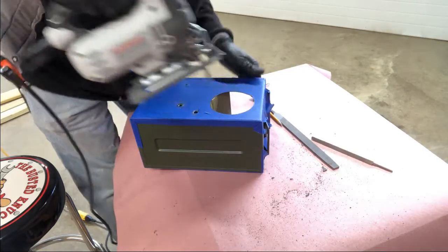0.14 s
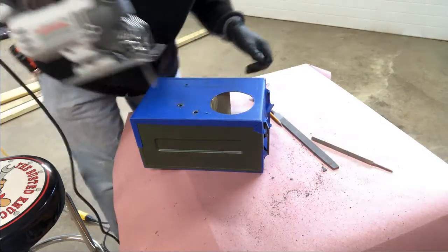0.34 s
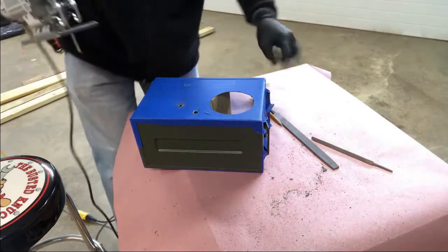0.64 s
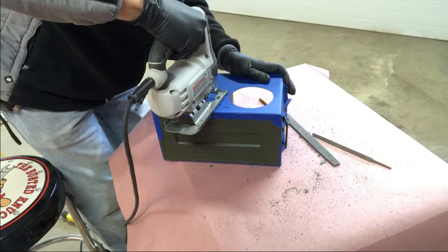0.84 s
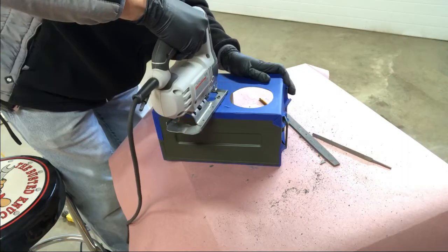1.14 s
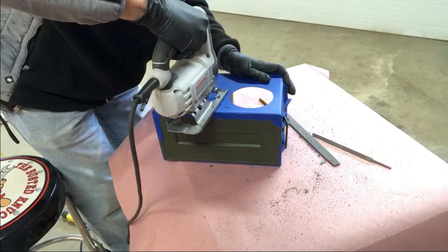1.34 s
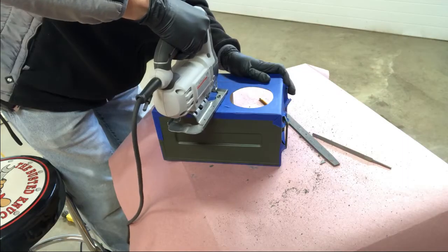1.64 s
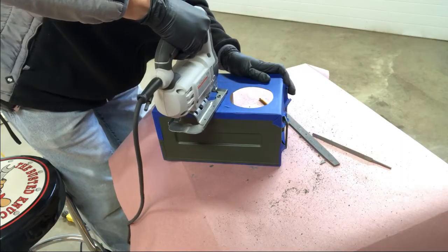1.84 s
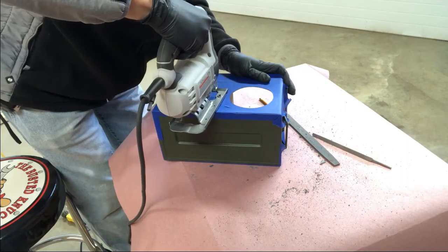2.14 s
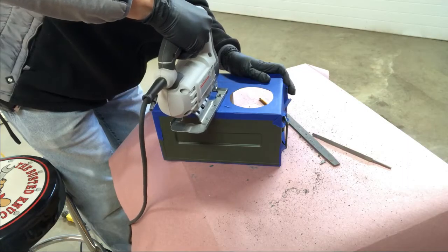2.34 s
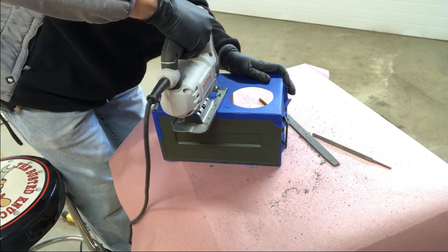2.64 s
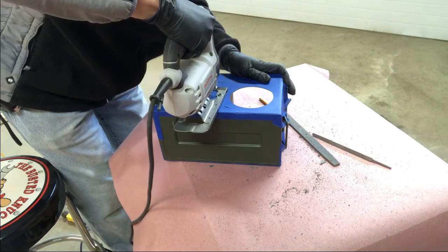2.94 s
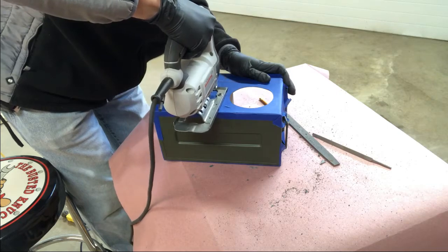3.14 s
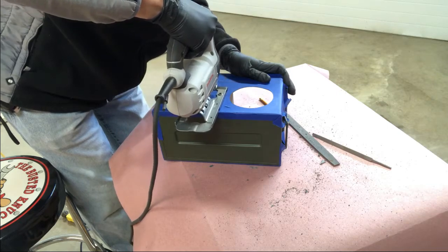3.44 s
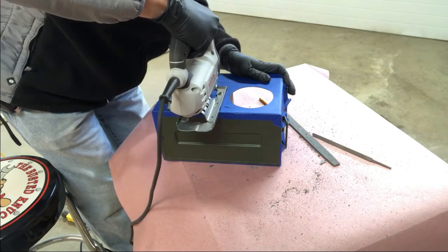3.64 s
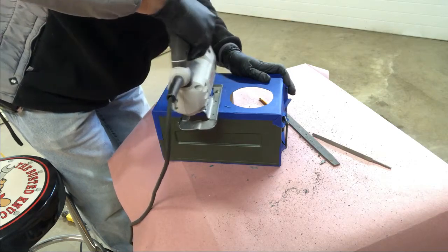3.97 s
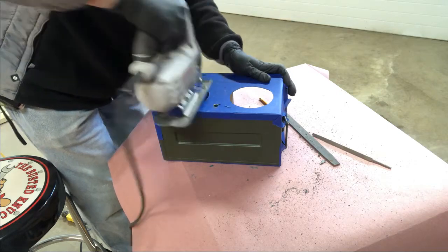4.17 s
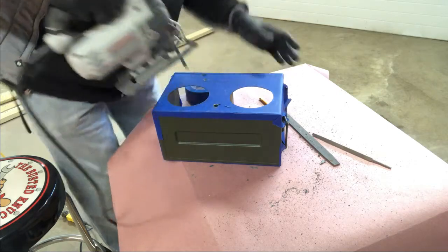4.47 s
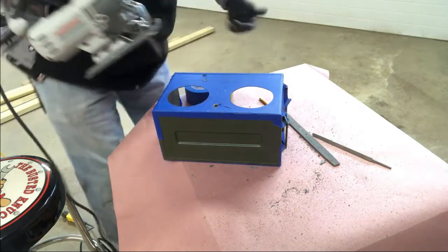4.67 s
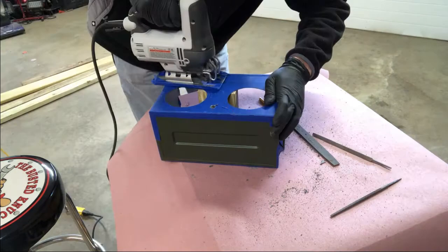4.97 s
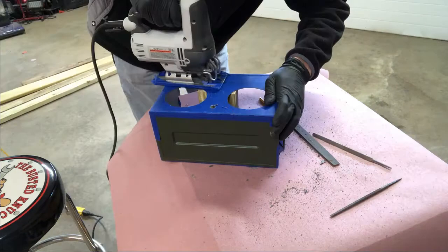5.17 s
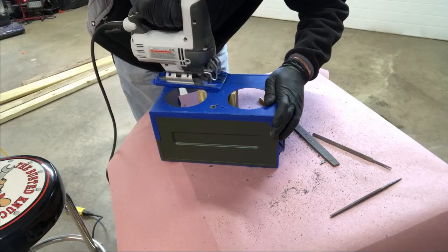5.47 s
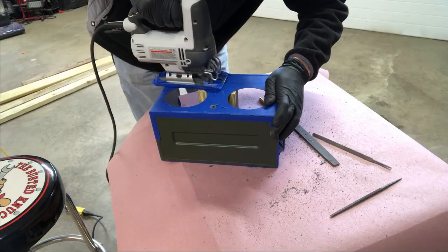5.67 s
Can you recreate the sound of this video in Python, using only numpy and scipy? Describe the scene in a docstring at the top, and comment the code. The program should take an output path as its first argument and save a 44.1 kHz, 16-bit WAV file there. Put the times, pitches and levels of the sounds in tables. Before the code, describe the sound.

A jigsaw is heard close up in mono, in a small workshop with a short echo and faint still air. From 0 to 0.75 s the switched-off motor runs down quietly: slowing swishes, falling gear whine, dry plunger ticks and tiny very high squeaks, with a few lower falling chirps. At 0.75 s a loud cut bursts in abruptly, about 43 strokes per second: an even metallic buzz, thin steel ringing with clear tones, teeth rasping. Around 2.6 s the blade binds; the sound grows rougher, hissier and more clattering, the hollow box shaking, then weakens and breaks free near 3.65 s. The blade grazes the rim softly while the motor coasts down until 4.9 s, its whine sinking, the swish pulsing slower, faint squeaks near the end. At 4.91 s a slower, heavier cut starts suddenly, about 30 strokes per second, coarse, loud and juddering, steady to the end.

```python
"""In a small workshop, a corded jigsaw cuts round holes in a thin steel box.
Each stroke of the blade knocks the sheet several times, which rings a bank of gliding resonances,
and its teeth rasp on the edge as filtered grainy noise: first fast, later slower and juddering.
Between cuts the motor coasts down: the gears whine lower as sines tied to the stroke rate,
and the plunger swishes as pulsing noise and squeaks in its guide as short high chirps."""
import sys
import numpy as np
from scipy import signal
from scipy.fft import rfft, irfft, next_fast_len
from scipy.io import wavfile

SR = 44100
rng = np.random.default_rng(int(sys.argv[2]) if len(sys.argv) > 2 else 0)


def master(y):
    """Save y as 16-bit WAV."""
    cut = np.clip(np.atleast_2d(y).T, -1, 1)
    pcm = np.round(cut * 32767)  # scale
    wavfile.write(sys.argv[1], SR, pcm.astype(np.int16))


N = 256220
T = np.arange(N) / SR   # s
# when the fast cut starts, the blade binds, comes free, and the slow cut starts (s)
FAST_S, BIND_S, FREE_S, SLOW_S = .745, 2.585, 3.65, 4.912
BOOM_TOP_HZ = 590   # below this the box booms, above it the sheet rings


def from_db(db):
    """Decibels to gain."""
    return 10 ** (np.asarray(db) / 20)


def rms_one(x):
    """Scale to rms 1."""
    return x / np.sqrt(np.mean(x ** 2) + 1e-20)


def in_time(rows):
    """Each column of a curve, interpolated at every sample."""
    s, *columns = np.transpose(rows)
    return [np.interp(T, s, column) for column in columns]


def between(start, stop, fade=0.00072):
    """A gate that opens and closes over the fade time in seconds."""
    opening = np.clip((T - start) / fade, 0, 1)
    closing = np.clip((stop - T) / fade, 0, 1)
    return opening * closing


def drift(rate):
    """Smooth random wandering of rms 1, with this many turning points a second."""
    knots = rng.standard_normal(N // 10)
    return rms_one(np.interp(T * rate, np.arange(len(knots)), knots))


def colour(x, points):
    """Filter by a spectrum of (Hz, dB) points, joined on a log frequency scale; rms 1."""
    size = next_fast_len(len(x), True)
    hz, db = np.transpose(points)
    log_bins = np.log(np.maximum(np.arange(size // 2 + 1) * SR / size, 1))
    gain = from_db(np.interp(log_bins, np.log(hz), db))
    return rms_one(irfft(rfft(x, size) * gain, size)[:len(x)])


def band(x, hz, kind, order=2):
    """Butterworth filter."""
    sos = signal.butter(order, np.minimum(hz, SR / 2 - 1), kind, fs=SR, output="sos")
    return signal.sosfilt(sos, x)


def resonate(x, hz, width):
    """One resonance, whose pitch may glide: shift it to 0 Hz, smooth, shift it back; rms 1."""
    turning = np.exp(2j * np.pi * np.cumsum(hz + np.zeros(len(x))) / SR)
    decay = np.exp(-np.pi * abs(width) / SR)
    envelope = signal.lfilter([1], [1, -decay], x / turning + 1e-18)
    return rms_one((turning * envelope).real)


def tail(x, t60):
    """Countless close modes or echoes: a dying noise response of unit energy."""
    response = rng.standard_normal(SR // 2) * from_db(-60 * T[:SR // 2] / t60)
    return signal.fftconvolve(x, response / np.linalg.norm(response))[:N]


def grains(grain_db):
    """Noise made of tiny impacts of uneven size."""
    return rng.standard_normal(N) * from_db(grain_db * drift(3000))


# the motor sags a little under load in the fast cut: time_s, speed_strokes_per_s
CUT_SPEED = [(.745, 42.79), (1.15, 42.24), (1.45, 42.25), (1.9, 42.67), (2.45, 42.54), (2.7, 42.8),
             (3.2, 42.84), (3.65, 43.2)]
SLOW_STROKES_PER_S = 30.33
# switched off at full speed, the motor first loses speed by air drag
SWITCH_OFF_S, COAST_DECAY_S = 3.687, 1.44
# once it is slow, friction brakes it evenly
RUNDOWN_STROKES_PER_S, BRAKING_PER_S2 = 19.32, 16.14


def motor_speed():
    """Strokes per second: running down, cutting fast, coasting, cutting slowly."""
    running_down = RUNDOWN_STROKES_PER_S - BRAKING_PER_S2 * T
    drag = np.exp(-np.maximum(T - SWITCH_OFF_S, 0) / COAST_DECAY_S)
    fast = in_time(CUT_SPEED)[0] * drag
    return np.select([T < FAST_S, T < SLOW_S], [running_down, fast], SLOW_STROKES_PER_S)


def crank():
    """Strokes made so far; the speed jumps at 0.745 s and 4.912 s, where the scene changes."""
    return np.cumsum(motor_speed()) / SR


# contacts of blade and shoe: stroke_share, level_db (relative, at 1700 Hz), brightness_db_per_octave
FAST_KNOCKS = [(.054, 2, -27), (.3, -4, -7), (.357, -11, 6), (.458, -18, -3), (.631, -16, 2),
               (.797, -6, -9), (.869, -14, 13), (.931, -9, 16)]
# the blade clicks against its guide: stroke_share, level_db (relative)
FAST_CLICKS = [(.41, -2), (0.959, -3)]
# the teeth bite going up and coming down: stroke_share, half_length_share, boost_db
FAST_BITES = [(.42, 0.15, 6.5), (.99, 0.099, 4)]
# resonances of the box, as in mid-cut: pitch_hz, width_hz, level_db (relative), glide_hz, change_db
FAST_MODES = [(413, 49, -13, 7, -12), (825, 19, -21.5, -1, 0.5), (1046, 57, -21, 4, -2),
              (1221, 26, -22.5, 4, 21), (1540, 58, -12, 6, -6), (1669, 100, -4.5, -11, 0.5),
              (1759, 27, -9.5, -15, 1.5), (1995, 10, -13.5, 34, -1), (2156, 110, -9.5, -74, 3),
              (2737, 100, -6.5, -25, -2), (3130, 65, -22, -20, 0), (3250, 62, -12.5, -50, 0.5),
              (5210, 56, -23.5, 9, 12)]
# low shaking of the box: stroke_rate_multiple, level_db (relative)
FAST_HUM = [(3, -13.5), (4, -13), (5, -5), (6, -5), (7, -4), (8, -4), (10, -12)]
# broad colour of the rasp and clatter: pitch_hz, level_db (relative)
FAST_COLOUR = [(59, -60), (100, -12), (205, 2), (396, 6.5), (460, 10), (593, -48), (925, -6), (1070, 0.5),
               (1300, -2.5), (1750, 2), (2400, -9), (2780, 1), (3660, -9.5), (7690, -20), (15800, -27)]
# how hard the saw is pushed, as the reference level of the sheet: time_s, push_db
FAST_PUSH = [(0.77, -38.5), (0.774, -37.5), (1.512, -40.5), (1.626, -41.5), (2.494, -41.5), (2.548, -46),
             (2.57, -43)]


def fast_cut(strokes):
    """Brisk, even sawing with clear tones of the sheet on top."""
    levels = under_load(in_time(FAST_PUSH)[0], rasp_follows=0.81)
    return singing(strokes, levels[1]) + cut(
        strokes, FAST_S, BIND_S, levels, FAST_KNOCKS, FAST_CLICKS, FAST_BITES,
        FAST_MODES, FAST_HUM, FAST_COLOUR,
        ring_db=-2.0, clatter_db=-16, hum_db=-24.5, boom_db=-23, rumble_db=-26.5,
        scrape_db=-10.5, rasp_db=-5.5, click_db=-15.5,
        bite_at=0.63, bite_db=2.0, scrape_lopsided_db=0.0, grain_db=-0.2)


# contacts of blade and shoe: stroke_share, level_db (relative, at 1700 Hz), brightness_db_per_octave
BIND_KNOCKS = [(0.042, -8.0, -19.6), (0.264, -0.8, 10.0), (0.38, -5.5, 9.3), (0.429, -4.9, 1.1),
               (0.622, -7.4, -14.6), (0.746, 4.3, 6.4), (0.892, 2.3, 8.5)]
# the blade clicks against its guide: stroke_share, level_db (relative)
BIND_CLICKS = [(.26, 0), (.73, -6), (.82, 0)]
# the teeth bite going up and coming down: stroke_share, half_length_share, boost_db
BIND_BITES = [(.21, 0.11, 6.6), (.85, 0.14, 4)]
# resonances of the box, as in mid-cut: pitch_hz, width_hz, level_db (relative), glide_hz, change_db
BIND_MODES = [(440, 40, -6, -62, 5), (777, 96, -13, 0, 6.5), (1007, 120, -12, 0, 2.5),
              (1157, 18, -17.5, 0, -3), (1206, 28, -10, -10, -2), (1499, 13, -18, 0, -10),
              (1905, 50, -19, 0, -2), (1465, 21, -3.5, -6, -1.5), (1585, 12, -9.5, -5, 8),
              (1710, 96, -9, -47, -1), (1763, 24, -7, -9, 2), (1848, 18, -7, -14, -4),
              (2073, 30, -13.5, 0, 2), (2250, 30, -14, -6, -4), (2740, 84, -14.5, -30, -2),
              (3127, 15, -14, -2, -3), (3840, 150, -15, 0, -1), (5240, 250, -13.5, 0, -2)]
# low shaking of the box: stroke_rate_multiple, level_db (relative)
BIND_HUM = [(3, -24.5), (4, -16), (5, -9), (6, -8.5), (7, -21), (8, -1), (9, -1), (10, 6.5), (11, 0.5)]
# broad colour of the rasp and clatter: pitch_hz, level_db (relative)
BIND_COLOUR = [(59, -69), (100, -41), (422, -6), (593, -16), (760, -14.5), (1170, -7), (1270, -16),
               (1440, -6), (1670, -1.5), (1780, -4.5), (2350, -10.5), (3090, -10.5), (3370, -13),
               (5140, -18), (5720, -21), (15800, -28.5)]
# how hard the saw is pushed, as the reference level of the sheet: time_s, push_db
BIND_PUSH = [(2.6, -39.5), (2.602, -39.5), (3.234, -39.5), (3.508, -42.5), (3.595, -43.5), (3.625, -51.5),
             (3.65, -66)]


def binding_cut(strokes):
    """The blade binds in the curve, hisses more, then breaks through."""
    levels = under_load(in_time(BIND_PUSH)[0], rasp_follows=1.5)
    return cut(
        strokes, BIND_S, FREE_S, levels, BIND_KNOCKS, BIND_CLICKS, BIND_BITES,
        BIND_MODES, BIND_HUM, BIND_COLOUR,
        ring_db=-1.13, clatter_db=-10.5, hum_db=-15.0, boom_db=-19.5, rumble_db=-20.0,
        scrape_db=-7, rasp_db=-5, click_db=-11.5,
        bite_at=0.31, bite_db=-1.5, scrape_lopsided_db=0.5, grain_db=0.8)


# contacts of blade and shoe: stroke_share, level_db (relative, at 1700 Hz), brightness_db_per_octave
SLOW_KNOCKS = [(0.172, 7.1, -11.6), (0.24, -0.0, -0.2), (0.305, -4.6, 13.1), (0.436, 1.5, 4.0),
               (0.512, 0.4, -3.7), (0.707, -8.5, 10.5), (0.844, -1.9, -6.8), (0.907, -5.0, 2.8)]
# the blade clicks against its guide: stroke_share, level_db (relative)
SLOW_CLICKS = [(.27, -3), (.36, -4), (.46, -7), (.72, -9), (.85, 0)]
# the teeth bite going up and coming down: stroke_share, half_length_share, boost_db
SLOW_BITES = [(.41, 0.12, 2.3), (.8, 0.093, 7.9)]
# resonances of the box, as in mid-cut: pitch_hz, width_hz, level_db (relative), glide_hz, change_db
SLOW_MODES = [(335, 18, -8, 5, 0), (744, 70, -17, -2, -1), (841.4, 20, -12.5, -14, 1.5),
              (1133, 100, -18, 0, 0), (1700, 22, -13, 0, -1), (2346, 90, -20, 0, -7), (3095, 46, -20, 0, 0),
              (1007, 62, -12, 17, 4), (1233, 264, -9.5, 22, 1.5), (1367, 68, -8.5, 8, -4),
              (1574, 61, -7, 20, 1), (1826, 160, -12.5, 57, 5), (2000, 13, -17.5, 13, 3),
              (2230, 18, -20, 15, -5), (2610, 58, -13, 38, -4), (3165, 32, -12.5, -30, 4),
              (3242, 110, -14, -43, -9), (3450, 120, -14.5, -24, -5), (4990, 23, -28, 0, 9)]
# low shaking of the box: stroke_rate_multiple, level_db (relative)
SLOW_HUM = [(2, -29), (4, -23), (5, -3.5), (6, -7.5), (7, 0.5), (8, -9), (9, -11), (10, -15), (11, 3.5),
            (12, -4.5), (13, -1), (14, -6.5), (15, -1), (16, -4)]
# broad colour of the rasp and clatter: pitch_hz, level_db (relative)
SLOW_COLOUR = [(35, -66), (60, -30), (206, -12), (300, -3.5), (337, -1.5), (416, -15), (467, -9),
               (563, -12.5), (837, -1), (1080, -4), (1570, -0.5), (1810, -8), (3160, -7.5), (4090, -15),
               (12000, -26), (15800, -27.5)]
SLOW_PUSH_DB = -37


def slow_cut(strokes):
    """Slower, heavier strokes under a steady push make the box judder."""
    levels = under_load(SLOW_PUSH_DB, rasp_follows=0.98)
    return cut(
        strokes, SLOW_S, np.inf, levels, SLOW_KNOCKS, SLOW_CLICKS, SLOW_BITES,
        SLOW_MODES, SLOW_HUM, SLOW_COLOUR,
        ring_db=-1.9, clatter_db=-9.5, hum_db=-11.0, boom_db=-29, rumble_db=-13.5,
        scrape_db=-8, rasp_db=-3.5, click_db=-12,
        bite_at=0.33, bite_db=3.5, scrape_lopsided_db=1.0, grain_db=2.0)


CLICK_T60_S, CLICK_LOW_HZ, CLICK_HIGH_HZ = 0.033, 3420, 6120


def cut(strokes, start, stop, levels, knocks, guide_clicks, bites, modes, hum, spectrum,
        ring_db, clatter_db, hum_db, boom_db, rumble_db, scrape_db, rasp_db, click_db,
        bite_at, bite_db, scrape_lopsided_db, grain_db):
    """The blade in the steel: knocks ring the box, the teeth rasp, the box shakes with the strokes."""
    gate = between(start, stop)
    strokes = strokes - np.interp(start, T, strokes)
    boom, ring, rasp = from_db(levels)

    def even(x):
        """Rms 1 while the blade cuts."""
        return x / np.sqrt(np.mean(x[gate > 0] ** 2))

    clicks = knocking(strokes, knocks)
    rings = list(ringing(clicks, gate, modes))
    sheet = sum(sound for hz, sound in rings if hz >= BOOM_TOP_HZ)
    box = sum(sound for hz, sound in rings if hz < BOOM_TOP_HZ)
    out = ring * from_db(ring_db) * even(sheet)
    out += ring * from_db(boom_db) * even(box)
    # between its strong resonances the sheet has many weak, short ones
    clatter = band(colour(tail(clicks(2200), .018), spectrum), [750, 5500], "band")
    out += ring * from_db(clatter_db) * even(clatter)
    shaking = sum(from_db(db + 1.0 * drift(13)) * np.sin(2 * np.pi * (k * strokes + rng.random()))
                  for k, db in hum)
    out += boom * from_db(hum_db) * even(shaking)
    # the scrape pulses twice a stroke and may be stronger one way
    angle = 2 * np.pi * (strokes - bite_at)
    bite = from_db(bite_db * np.cos(2 * angle) + 0.38 * drift(70))
    lopsided = from_db(scrape_lopsided_db * np.cos(angle))
    teeth = colour(grains(grain_db) * biting(strokes, bites) * from_db(0.67 * drift(70)), spectrum)
    scrape = colour(grains(grain_db) * bite * lopsided, spectrum)
    out += rasp * from_db(rasp_db) * even(blade(band(teeth, 4330, "high")))
    click_train = knocking(strokes, [(at, db, 0) for at, db in guide_clicks])(CLICK_LOW_HZ)
    clicking = band(tail(click_train, CLICK_T60_S), [CLICK_LOW_HZ, CLICK_HIGH_HZ], "band", order=3)
    out += rasp * from_db(click_db) * even(clicking)
    out += ring * from_db(scrape_db) * even(band(scrape, [550, 3400], "band"))
    out += boom * from_db(rumble_db) * even(band(scrape, BOOM_TOP_HZ, "low", order=4))
    return out * gate


def knocking(strokes, knocks):
    """Contacts repeat unevenly every stroke; gives the click train as felt at a frequency."""
    share, level_db, tilt_db = np.transpose(knocks)
    turns = np.arange(np.ceil(strokes[0]), np.ceil(strokes[-1]))[:, None] + share
    times = np.interp(turns, strokes, T) + .000026 * rng.standard_normal(turns.shape)   # s
    at = np.clip(np.round(times * SR).astype(int), 0, N - 1).ravel()
    force_db = level_db + 1.2 * rng.standard_normal(turns.shape)

    def train(hz):
        """Clicks with the force they have at this frequency."""
        return np.bincount(at, from_db(force_db + tilt_db * np.log2(hz / 1700)).ravel(), N)

    return train


SKIRT_HZ = 235


def ringing(clicks, gate, modes):
    """Knocks ring the sheet; each resonance drifts as the slot grows. Gives (Hz, sound) pairs."""
    cutting = gate > 0
    progress = -np.cos(np.linspace(0, np.pi, cutting.sum())) / 2   # -1/2 to 1/2 over the cut
    for hz, width, db, glide_hz, change_db in modes:
        # each resonance swells over a few cycles as bending waves spread
        force = band(clicks(hz)[cutting], [hz - SKIRT_HZ, hz + SKIRT_HZ], "band")
        level = from_db(db + change_db * progress)
        sound = np.zeros(N)
        sound[cutting] = level * resonate(force, hz + glide_hz * progress, width)
        yield hz, sound


def biting(strokes, bites):
    """Gain of the rasp through the stroke: a smooth hump at each bite."""
    gain_db = 0
    for at, length, db in bites:
        away = (strokes - at + .5) % 1 - .5   # shortest way round the stroke
        gain_db = gain_db + db * np.exp(-(away / length) ** 2)
    return from_db(gain_db)


# high resonances of blade and shoe: pitch_hz, width_hz, level_db (relative to the friction noise)
BLADE = [(4050, 250, -18), (5330, 550, -51), (7800, 410, -18), (10230, 560, -20.5), (14800, 400, -27)]


def blade(x):
    """Friction noise with the ring of blade and shoe on top; rms 1."""
    ring = sum(from_db(db) * resonate(x, hz, width) for hz, width, db in BLADE)
    return rms_one(rms_one(x) + ring)


# steady tones of the sheet: stroke_rate_multiple, level_db (relative to the ring), change_db_per_s
FAST_TONES = [(11, -14, -4), (26.1, -15, -4), (34, -13, -5), (35, -9.5, -3)]


def singing(strokes, ring_db):
    """Multiples of the stroke rate that meet a resonance of the sheet stand out as clear tones."""
    tones = 0
    for k, db, db_per_s in FAST_TONES:
        level = from_db(ring_db + db + db_per_s * (T - FAST_S) + drift(13.4))
        tones = tones + level * np.sin(2 * np.pi * (k * strokes + rng.random()))
    return between(FAST_S, BIND_S) * tones


USUAL_PUSH_DB = -40
BOOM_FOLLOWS = 0.64   # share of a change in push that reaches the boom of the box
# the box shakes harder for a while as the blade bites in, mid-cut, and as the disc comes loose:
# centre_s, half_length_s, boost_db
BOOMS = [(0.884, 0.088, 0.5), (2.1, 0.49, 6), (2.672, 0.025, 4), (3.58, 0.25, 6)]


def under_load(push_db, rasp_follows):
    """Levels of box boom, sheet ring and tooth rasp in dB: all three rise with the push."""
    harder = push_db - USUAL_PUSH_DB + np.zeros(N)
    swells = sum(db * np.exp(-((T - s) / length) ** 2) for s, length, db in BOOMS)
    return USUAL_PUSH_DB + np.array([BOOM_FOLLOWS * harder + swells, harder, rasp_follows * harder])


# broad colour of the sliding plunger: pitch_hz, level_db (relative)
COAST_COLOUR = [(47, -50), (80, -45), (114, -27), (145, -22), (360, -3.5), (612, -3), (684, -0.5),
                (1980, -2), (2410, -1.5), (4290, -1.5), (7130, -7), (9710, -9.5), (11300, -13.5),
                (12400, -16), (15800, -17.5)]


def coasting(strokes):
    """The works run under the fast cut, then slow down in the open."""
    levels = with_speed(rattle_db_per_octave=5.0, slide_db_per_octave=3.0, gears_db_per_octave=3.0)
    works = free_run(strokes - np.interp(FREE_S, T, strokes), levels, COAST_COLOUR,
                     slide_at=0.034, swish_db=0.5, slide_db=-56.5, rattle_db=-70.0,
                     gears_db=-58.5, throb_at=0.037, throb_db=10)
    return works * between(FAST_S, SLOW_S) + grazing(strokes)


# broad colour of the sliding plunger: pitch_hz, level_db (relative)
RUNDOWN_COLOUR = [(47, -58), (80, -41), (295, -17.5), (368, -19), (763, -7), (1020, -9), (1400, -5.5),
                  (1650, 0.5), (1900, -6.5), (2800, -5), (3670, -4.5), (4290, -6.5), (9090, -10.5),
                  (12700, -12), (15800, -16)]


def rundown(strokes):
    """The last slow strokes of a motor switched off."""
    levels = with_speed(rattle_db_per_octave=14.5, slide_db_per_octave=8.5, gears_db_per_octave=22)
    works = free_run(strokes, levels, RUNDOWN_COLOUR,
                     slide_at=0.11, swish_db=2.0, slide_db=-46.5, rattle_db=-59.0,
                     gears_db=-48.5, throb_at=0.042, throb_db=9)
    return works * between(-1, FAST_S) + ticks() + low_chirps()


# gear whine: stroke_rate_multiple, level_db (relative)
GEARS = [(68, 3), (136, -1), (204, 7), (272, 2), (340, -1)]
# how well the housing radiates the whine: pitch_hz, gain_db
HOUSING = [(1000, -24), (1250, -16), (1400, -6), (1600, -3), (1800, -5), (2050, -6), (2300, -19),
           (3200, -16), (3550, -5), (3850, -5), (4000, -16), (4300, -7), (4520, -4.5), (4900, -19),
           (5500, -12), (5900, -16), (6450, -8), (7300, -22), (8000, -16), (8800, -12), (9300, -17),
           (9800, -5), (10400, -21)]


def free_run(strokes, levels, spectrum, slide_at, swish_db, slide_db, rattle_db,
             gears_db, throb_at, throb_db):
    """The saw's own works: plunger sliding twice a stroke, and gear whine."""
    rattle, slide, gears = from_db(levels)
    pace = np.cos(4 * np.pi * (strokes - slide_at))
    friction = colour(grains(2.26) * from_db(swish_db * pace), spectrum)
    out = slide * from_db(slide_db) * blade(band(friction, BOOM_TOP_HZ, "high", order=3))
    out += rattle * from_db(rattle_db) * rms_one(band(friction, BOOM_TOP_HZ, "low", order=3))
    # the crank's uneven load makes the gears waver and throb
    load = np.cos(4 * np.pi * (strokes - throb_at))
    wheel = strokes + .00055 * drift(200) + .0009 * load
    speed = np.gradient(strokes) * SR
    for k, db in GEARS:
        # each tone swells as it falls through a housing resonance
        housing_db = np.interp(k * speed, *np.transpose(HOUSING))
        whine_db = db + housing_db + throb_db * (load - .7) + 2 * drift(40)
        out += gears * from_db(gears_db + whine_db) * np.sin(2 * np.pi * k * wheel)
    return out


LEVEL_STROKES_PER_S = 20   # the free-running levels hold at this speed


def with_speed(rattle_db_per_octave, slide_db_per_octave, gears_db_per_octave):
    """Changes of housing rattle, sliding and gear whine in dB: each follows the motor speed."""
    octaves = np.log2(motor_speed() / LEVEL_STROKES_PER_S)
    return np.outer([rattle_db_per_octave, slide_db_per_octave, gears_db_per_octave], octaves)


# the freed blade grazes the rim while it is drawn out, and box and blade ring;
# the fades lie outside these times: start_s, until_s, pitch_hz, width_hz, level_db
GRAZES = [(3.4, 3.79, 420, 290, -68.5), (3.84, 3.88, 390, 110, -61), (3.3, 4.15, 1020, 330, -63),
          (3.75, 4.36, 4200, 300, -66.5), (4.22, 4.46, 677, 120, -69)]
GRAZE_RELEASE_S = 0.052


def grazing(strokes, pulse_db=3):
    """The freed blade brushes the rim twice a stroke and sounds the box softly until it is clear."""
    brush = grains(3.3) * from_db(pulse_db * np.cos(4 * np.pi * strokes))
    out = np.zeros(N)
    for start, until, hz, width, db in GRAZES:
        ring = resonate(resonate(brush, hz, width), hz, width)
        gate = between(start - GRAZE_RELEASE_S, until + GRAZE_RELEASE_S, GRAZE_RELEASE_S)
        out += from_db(db) * ring * gate
    return out


# once it is slow, the plunger knocks in its slack at the end of each stroke:
# time_s, level_db (before the ring and filter)
TICKS = [(.207, -22), (0.26, -19), (.326, -23), (.4, -24), (.481, -24), (.574, -25), (.68, -23.5)]


def ticks(t60=0.025):
    """Dry knocks of the plunger at the end of its travel: clicks with a short noisy ring."""
    s, db = np.transpose(TICKS)
    clicks = np.bincount((s * SR).astype(int), from_db(db), N)
    return band(tail(clicks, t60), [1200, 7000], "band", order=1)


# the dry guide squeaks on the half strokes of the slowing plunger: time_s, level_db (peak)
SQUEAKS = [(.012, -46), (.085, -53), (.118, -55), (.147, -49), (.177, -47), (.203, -47), (.233, -55),
           (.272, -53), (.306, -47), (.34, -51), (.378, -50), (.414, -46), (.455, -52), (.5, -46),
           (.548, -52), (.597, -53), (.657, -54), (.708, -53), (4.422, -59), (4.54, -65), (4.585, -59),
           (4.635, -61), (4.68, -57), (4.725, -61), (4.773, -60), (4.8, -61), (4.825, -59), (4.85, -58),
           (4.877, -52), (4.9, -57)]
# half length of a squeak in strokes, and how much higher it is there
SQUEAK_HALF_STROKES, SQUEAK_BEND_HZ = 0.16, 300
SQUEAK_HZ, SQUEAK_SAG_HZ_PER_S, SQUEAK_FLUTTER_HZ = 12390, 38, 210


def squeaks():
    """Each squeak fits a half stroke, loudest and lowest where the plunger moves fastest."""
    out = np.zeros(N)
    speed = motor_speed()
    flutter = SQUEAK_FLUTTER_HZ * drift(1300)
    for s, db in SQUEAKS:
        near = abs(T - s) < .05
        away = (T[near] - s) * np.interp(s, T, speed) / SQUEAK_HALF_STROKES
        pitch = SQUEAK_HZ - SQUEAK_SAG_HZ_PER_S * s + SQUEAK_BEND_HZ * away ** 2 + flutter[near]
        out[near] += from_db(db) * np.exp(-away ** 2) * np.sin(2 * np.pi * np.cumsum(pitch) / SR)
    return out


# lower chirps of the guide: time_s, level_db (peak)
LOW_CHIRPS = [(.305, -57), (0.505, -56), (.603, -53), (.713, -53)]
LOW_CHIRP_HZ, LOW_CHIRP_FALL_HZ_PER_S = 6900, 34000   # pitch at its middle, and fall
LOW_CHIRP_FLUTTER_HZ, LOW_CHIRP_HALF_S = 131, .01


def low_chirps():
    """As the plunger crawls, its guide also gives a lower, falling chirp on one way of the stroke."""
    wavering = LOW_CHIRP_FLUTTER_HZ * drift(1300)
    out = np.zeros(N)
    for s, db in LOW_CHIRPS:
        pitch = LOW_CHIRP_HZ - LOW_CHIRP_FALL_HZ_PER_S * (T - s) + wavering
        swell = np.exp(-((T - s) / LOW_CHIRP_HALF_S) ** 2)
        out += from_db(db) * swell * np.sin(2 * np.pi * np.cumsum(pitch) / SR)
    return out


# still air of the workshop: pitch_hz, level_db (relative)
ROOM_TONE = [(25, -10), (70, -2.5), (150, -1.5), (500, 2), (3000, -12), (15000, -23)]


def scene(room_db=-14, room_t60=0.12, room_tone_db=-80):
    """The saw close by, a little workshop echo and the still air."""
    strokes = crank()
    saw = fast_cut(strokes) + binding_cut(strokes) + slow_cut(strokes)
    saw += coasting(strokes) + rundown(strokes) + squeaks()
    echo = from_db(room_db) * band(tail(saw, room_t60), [250, 7000], "band", order=1)
    air = from_db(room_tone_db) * colour(rng.standard_normal(N), ROOM_TONE)
    return (saw + echo + air)[None]


CUTOFF_HZ = 15800


def record(dry):
    """The highest peaks are rounded and the top is cut steeply."""
    rounded = .09 * np.tanh(dry / .09)
    return signal.sosfilt(signal.ellip(12, .1, 80, CUTOFF_HZ, fs=SR, output="sos"), rounded)


dry = scene()
out = record(dry)
master(out)
```